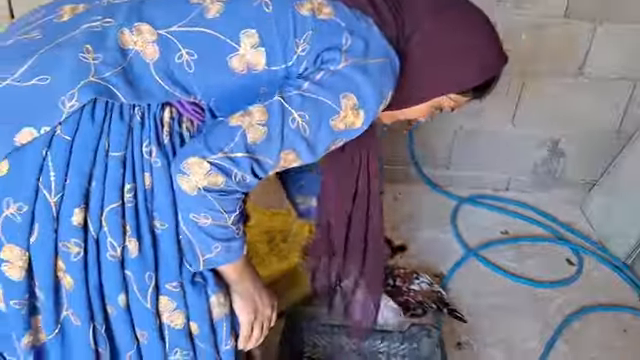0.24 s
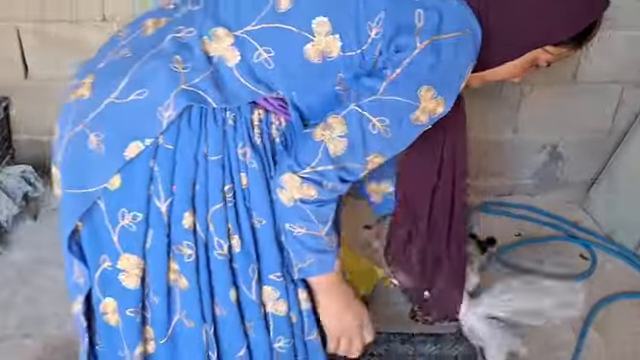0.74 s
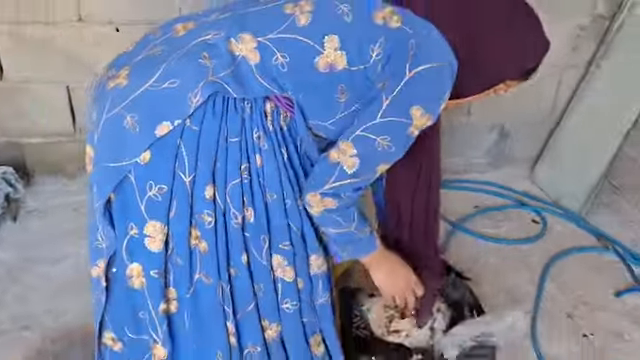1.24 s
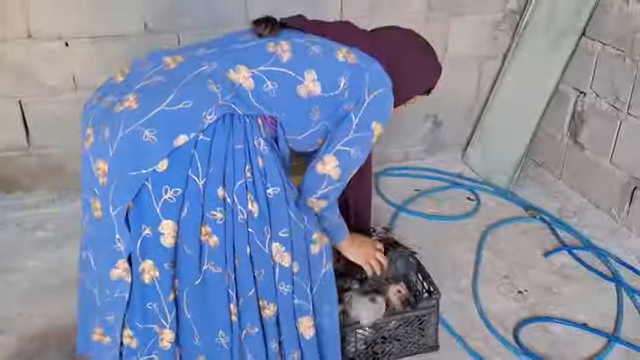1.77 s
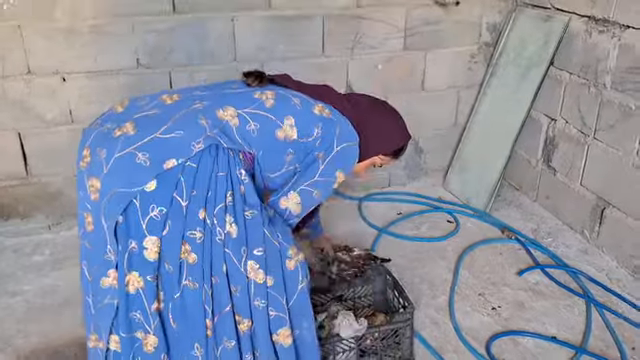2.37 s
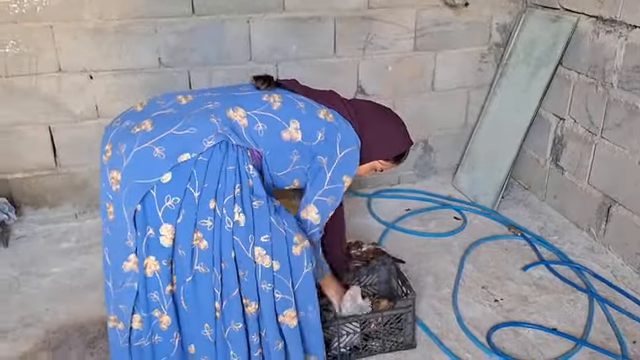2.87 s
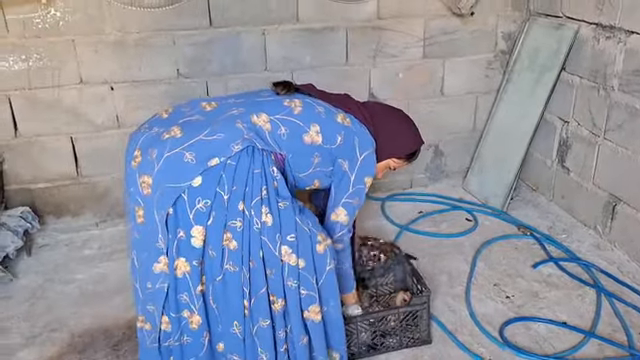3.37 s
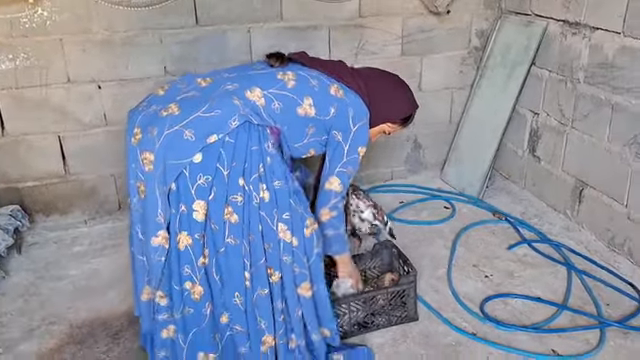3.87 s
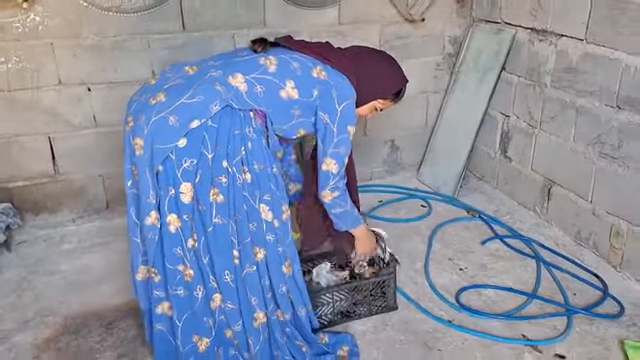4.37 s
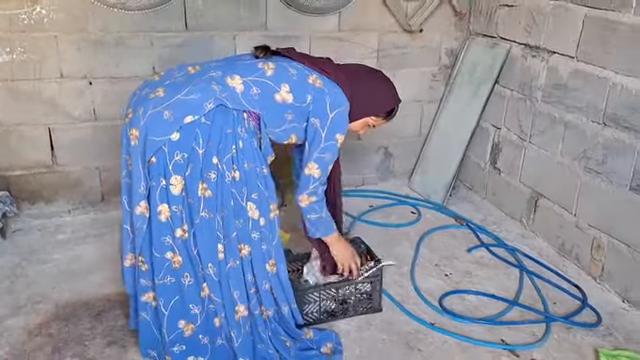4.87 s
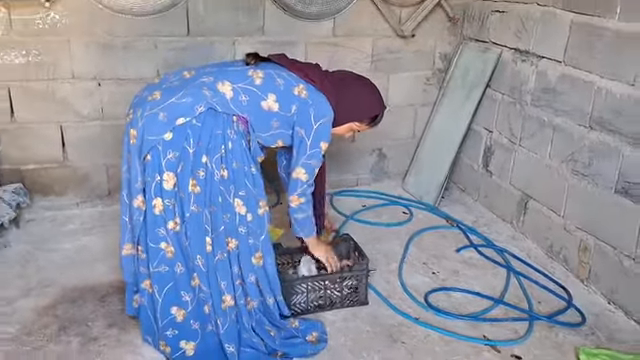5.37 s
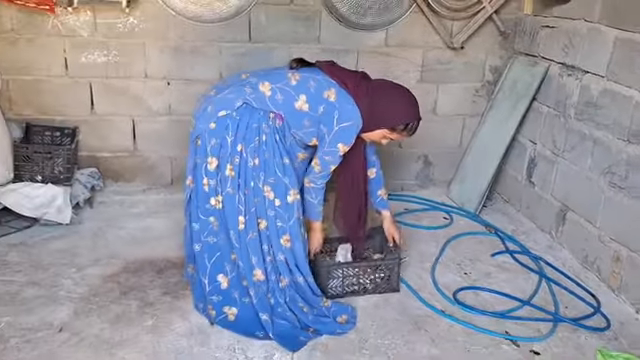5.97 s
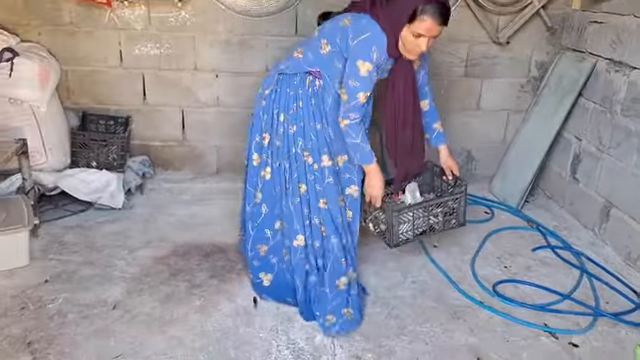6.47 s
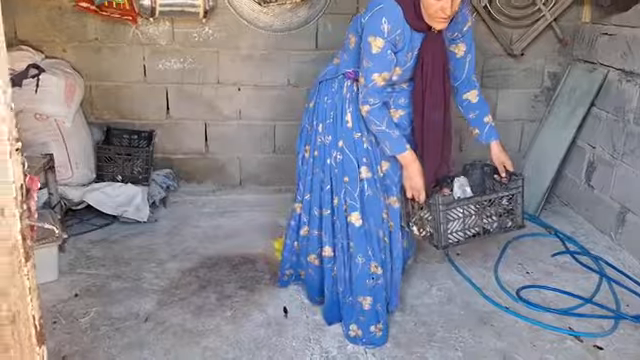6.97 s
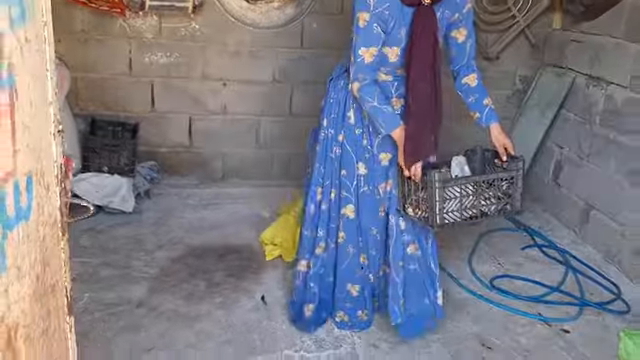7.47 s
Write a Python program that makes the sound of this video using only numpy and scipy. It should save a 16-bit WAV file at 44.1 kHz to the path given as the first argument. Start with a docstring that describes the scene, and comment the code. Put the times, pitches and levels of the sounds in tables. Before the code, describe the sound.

Loud, raspy chicken cries and short clucks with soft rustling, then a plastic crate scrapes and ticks lightly as a motor hum grows.

```python
"""A hen squawks, clucks and shrieks while hands push her into a plastic crate in a bare block shed.
Feathers and a bag rustle from the start as banded noise; each cry is a sum of partials of a flapping syrinx.
A motor hums throughout as wavering sines over a rumble, louder in the second half, above faint air noise.
Late on, the crate scrapes in noise strokes as it is lifted, and ticks ring its resonances.
A thin high hiss swells at the very end."""
import sys
import numpy as np
from scipy import signal
from scipy.fft import rfft, irfft, next_fast_len
from scipy.io import wavfile
from scipy.ndimage import uniform_filter1d

SR = 44100
rng = np.random.default_rng(int(sys.argv[2]) if len(sys.argv) > 2 else 0)


def output_pcm(signal):
    """Save a mono or channel-first signal as 16-bit PCM at the path in sys.argv[1].

    Samples are clipped to [-1, 1] before scaling.
    """
    pcm = np.clip(np.atleast_2d(signal).T, -1, 1) * 32767
    wavfile.write(sys.argv[1], SR, np.round(pcm).astype(np.int16))


N = 341334


def from_db(db):
    """Gain of a level in dB."""
    return 10 ** (np.asarray(db) / 20)


def rms_one(x):
    """Scaled to rms 1."""
    return x / np.sqrt(np.mean(x ** 2) + 1e-20)


def in_time(rows):
    """Columns of a curve, one value per sample."""
    s, *columns = np.transpose(rows)
    return [np.interp(np.arange(N) / SR, s, c) for c in columns]


def at_hz(points, hz):
    """Spectrum table read on a log frequency axis."""
    table_hz, value = np.array(points).T
    return np.interp(np.log(hz), np.log(table_hz), value)


def band_pass(order, edges_hz, x):
    """Butterworth band-pass."""
    return signal.sosfilt(signal.butter(order, edges_hz, "band", fs=SR, output="sos"), x)


def drift(rate_hz, size=N):
    """Slow random wander of rms 1: noise through a double one-pole low-pass, start-up discarded."""
    r = np.exp(-2 * np.pi * rate_hz / SR)
    run_in = 20000
    wander = signal.lfilter([1], [1, -2 * r, r * r], rng.standard_normal(size + run_in))
    return rms_one(wander[run_in:])


def banded_noise(spectrum, patchy_db, likeness):
    """Half-octave bands of stereo noise, each with its own level, flicker and left-right likeness; rms 1."""
    out = 0
    edges_hz = 25 * 2 ** np.arange(0, 9.6, .5)
    white = rng.standard_normal((2, 2, N))
    flicker = [drift(14.7) for _ in range(4)]
    for k, (low_hz, high_hz) in enumerate(zip(edges_hz, edges_hz[1:])):
        mid, side = band_pass(2, [low_hz, high_hz], white[k % 2])
        hz = np.sqrt(low_hz * high_hz)
        alike = np.clip(at_hz(likeness, hz), -1, 1)
        # one flicker shared by all bands, one by every third
        gain = from_db(at_hz(spectrum, hz) + patchy_db * (flicker[0] + flicker[1 + k % 3]))
        out = out + gain * (np.sqrt(1 + alike) * mid + np.sqrt(1 - alike) * side * [[1], [-1]])
    return rms_one(out)


def faded(size, rise_s, fall_s):
    """Linear ramps at both ends of a stretch."""
    t = np.arange(size) / SR
    return np.clip(np.minimum(t / rise_s, (t[-1] - t) / fall_s), 0, 1)


def swell(start_s, rise_s, hold_s, fall_s, depth_db=-25):
    """Gain that climbs, holds and sinks, linear in dB; silent outside."""
    corners_s = start_s + np.cumsum([0, rise_s, hold_s, fall_s])
    levels_db = [depth_db, 0, 0, depth_db]
    return from_db(np.interp(np.arange(N) / SR, corners_s, levels_db, left=-200, right=-200))


# voice manners: (roughness [0-1], share of cry before it breaks [0-1], roughness once broken [0-1],
#   half-pitch share [0-1])
CLEAR, FRAYING, THIN = (.05, .95, .1, .05), (.05, .8, .5, .05), (.16, .5, .25, .06)
BREAKING, HOARSE = (.28, .35, .5, .35), (.3, .5, .42, .2)
HARSH, RASPING = (.42, .5, .6, .2), (.5, .3, .62, .1)
TEARING, CLEARING = (.17, .3, .52, .15), (.38, .5, .14, .15)
BUZZY, DOUBLED, CROAKY = (.36, .5, .48, .6), (.38, .5, .52, .9), (.55, .5, .75, .7)
# long cries: (beak resonance [Hz], mouth resonance [Hz], beak prominence [dB],
#   windpipe tone, rasp, sheen [dB re breath], manner)
SQUAWKS = [ (1750, 2750, 6.6, -7, -2, -9.5, TEARING), (1370, 2700, 8.7, 0, 1, -10.5, BREAKING),
           (2060, 3520, 8.9, 0.5, -3, -12.5, CLEAR), (1720, 4670, 17.3, -1, -7, -12.5, BUZZY),
           (1610, 3470, 5.7, 0.5, -2, -12, FRAYING), (1820, 1730, 12, -4, -1.5, -5.5, CLEAR),
           (1665, 3180, 15, -5.5, -5, -13.5, DOUBLED), ]
# course of each long cry: (time [s], pitch [Hz], breath [dB], gain from the open beak [dB])
SQUAWK_EFFORT = [
    [(.048, 595.6, -31.5, 1), (.073, 621.4, -26.5, -2), (.109, 700.4, -27.5, 6), (.183, 625, -31, 4),
     (.22, 640.4, -74, -5)],
    [(1.375, 604, -39, 0), (1.39, 618, -28.5, -10), (1.412, 660, -31, 8.5), (1.462, 646.6, -27.5, 4),
     (1.562, 628.7, -28.5, -1.5), (1.62, 628, -62.5, 9)],
    [(2.33, 661, -30.5, 7), (2.364, 673, -26, -2), (2.424, 659.7, -26, -4), (2.486, 657, -29.5, 1),
     (2.588, 656.5, -30.5, 1.5), (2.724, 644, -32.5, 8.5), (2.76, 656.4, -53, -2)],
    [(2.762, 560, -40, 3), (2.785, 563, -37.5, 6.5), (2.82, 549, -38.5, 9), (2.884, 618, -30.5, 1.5),
     (2.978, 617, -28, -2), (3.028, 607, -32.5, 3.5), (3.08, 593, -48.5, 3)],
    [(3.72, 664, -28.5, -19), (3.756, 635.4, -32.5, -8.5), (3.854, 637.4, -31, -9), (3.94, 636.3, -32, 4),
     (3.994, 625.4, -33.5, 7), (4.024, 599.6, -38.5, 2.5), (4.07, 593, -58.5, 7)],
    [(4.38, 600, -27, -1), (4.394, 624, -30, -2.5), (4.432, 615.7, -32.5, 11.5), (4.486, 620.7, -37, 12),
     (4.6, 616.7, -30.5, 2.5), (4.63, 623, -28, 8.5)],
    [(6.215, 686, -37, 22), (6.233, 692, -34, 7.5), (6.255, 593, -33, 5.5), (6.325, 638.5, -25, 3),
     (6.433, 580, -29.5, 6.5), (6.48, 592, -46, -5)],
]
# short cries: (start [s], rise [s], hold [s], fall [s], peak [dB], change over the hold [dB],
#   first pitch [Hz], last pitch [Hz], beak resonance [Hz], mouth resonance [Hz],
#   beak prominence [dB], windpipe tone, rasp, sheen [dB re peak], manner)
CLUCKS = [ (.418, .027, .01, .065, -24.5, -1.5, 604.3, 596, 1510, 2700, 14, -12, -10, -14, BUZZY),
          (.72, .016, 0.0097, .05, -28, -5, 557, 555, 1530, 3200, 22, -9.5, -15, -21, CROAKY),
          (0.969, .019, 0.0049, .05, -23, 0.5, 582.5, 582, 1720, 3160, 11, -13.5, -15.5, -24, BUZZY),
          (1.232, .015, .02, 0.062, -24, 1.5, 660.5, 620, 1400, 3470, 3.6, -19, -15.5, -19.5, HARSH),
          (1.675, 0.011, 0.025, 0.052, -26.5, -4, 635.6, 612, 1800, 3460, 3.1, -11, -12, -20, THIN),
          (1.854, .015, 0.023, 0.038, -29, 0.5, 556.6, 582, 1600, 2770, 2.5, -10, -12.5, -21.5, BUZZY),
          (1.94, .024, .085, 0.0055, -33, -9, 563.3, 570, 1720, 3100, 15, -9, -7, -19, CROAKY),
          (2.055, 0.03, .045, .012, -25.5, -8.5, 566, 635, 1220, 3600, 5.8, -4.5, -4, -20, HOARSE),
          (2.139, .012, .17, 0.0082, -37.5, -5, 749.5, 801.5, 1630, 3300, 2.7, 5.5, 3.5, -9, RASPING),
          (3.2, 0.037, 0.0091, 0.049, -39.5, 1, 612.5, 603, 1750, 2750, 10, 1.5, -9, -18, DOUBLED),
          (3.39, .024, 0.043, 0.012, -31.5, -11, 686, 679, 1410, 2730, 7.3, -10.5, -13.5, -22, HARSH),
          (3.5, 0.0099, 0.054, .012, -48.5, 3.5, 702, 701, 1450, 2930, 5.4, 1.5, -13, -33, THIN),
          (3.59, 0.041, 0.077, 0.019, -29, 0, 720, 808, 1550, 3000, 12, -4.5, -14, -30.5, HOARSE),
          (4.101, 0.064, .015, .035, -34, 0, 584.4, 589.4, 1185, 3300, 11, -22, -18, -34, HARSH),
          (4.278, 0.0081, 0.092, .004, -32, 3.5, 658, 613.4, 1655, 2830, 19, -8, -6, -17.5, CLEARING),
          (4.63, .015, 0.041, 0.0035, -21, -4, 632, 634, 1750, 2800, 6.9, -8.5, -9, -11, DOUBLED),
          (4.69, 0.0061, .11, 0.046, -29, -3.5, 577, 544, 1600, 2970, 9.7, -10, -14.5, -24, CROAKY),
          (4.9, 0.03, 0.011, .06, -23.5, -8, 667.5, 637, 1770, 3290, 25, -7.5, -9.5, -17, HOARSE),
          (5.131, 0.0176, .11, 0.055, -29.5, -2.5, 567, 578, 1580, 2820, 11, -6, -9, -18.5, CROAKY),
          (5.381, .04, 0.004, .03, -54, 2.5, 540, 527.3, 1600, 3340, 41, -18, -21, -26, THIN),
          (5.475, 0.026, 0.0049, .03, -30, 1, 530, 492, 1550, 2580, 32, -42, -26, -55, THIN),
          (5.925, 0.013, 0.022, .04, -45.5, 1, 461, 457, 1720, 2800, 20, -6.5, -23, -30, THIN),
          (6.117, .018, .05, .022, -24, -20, 455.5, 453.5, 1340, 2710, 26, -27, -28.5, -36, THIN), ]


def hen():
    """All cries in turn; one that follows without a pause rises more slowly, out of the last."""
    out, last_end_s = np.zeros((2, N)), 0
    cries = [cluck(*row) for row in CLUCKS]
    cries += [voiced(effort, *voice) for effort, voice in zip(SQUAWK_EFFORT, SQUAWKS)]
    for rows, manner, beak_db in sorted(cries, key=lambda c: c[0][0][0]):
        start_s = rows[0][0]
        rise_s = .016 if start_s - last_end_s < .012 else .003
        sound = cry(rows, *manner, beak_db, rise_s)
        start, last_end_s = round(start_s * SR), rows[-1][0]
        out[:, start:start + sound.shape[1]] += sound
    return out


ONSET_DB, DYING_DB = -14, -26   # start and end of a short cry
ABRUPT_S = 0.036   # a quicker rise or fall covers only its share of that
BLOOM = 0.23   # share of the swell that comes from opening the beak


def cluck(start_s, rise_s, hold_s, fall_s, peak_db, change_db, first_hz, last_hz, *voice):
    """Attack, hold and release; the pitch glides evenly from first to last."""
    s = start_s + np.cumsum([0, rise_s, hold_s, fall_s])
    onset_db = ONSET_DB * min(1, rise_s / ABRUPT_S)
    dying_db = DYING_DB * min(1, fall_s / ABRUPT_S)
    shape_db = np.array([onset_db, 0, change_db, change_db + dying_db])
    hz = np.interp(s, [s[0], s[-1]], [first_hz, last_hz])
    return voiced(zip(s, hz, peak_db + (1 - BLOOM) * shape_db, BLOOM * shape_db), *voice)


RASP_FOLLOWS, SHEEN_FOLLOWS = 0.21, 0.48   # share of the beak's gain [dB/dB]


def voiced(effort, beak_hz, mouth_hz, beak_db, low_db, rasp_db, sheen_db, manner):
    """Opening the beak lifts its own band most, rasp and sheen less, the windpipe tone not at all."""
    rows = [(s, hz, beak_hz, mouth_hz, breath_db + gape_db, low_db - gape_db,
             rasp_db - (1 - RASP_FOLLOWS) * gape_db, sheen_db - (1 - SHEEN_FOLLOWS) * gape_db)
            for s, hz, breath_db, gape_db in effort]
    return rows, manner, beak_db


CATCH, CATCH_S, BREAK_S = .3, .018, .04   # extra roughness at onset, its decay time, time to break
BEAK_WIDTH_HZ, MOUTH_WIDTH_HZ, MOUTH_DB = 195, 490, 8
CUTOFF_HZ = 15850
HOP = 64   # samples per partial-size step
# limits between windpipe tone, beak band, rasp and sheen: [Hz]
BAND_EDGES_HZ = [1000, 2300, 5500]
# throat slope inside the bands: (frequency [Hz], level [dB])
THROAT = [(200, -3.5), (330, -6), (630, 3), (950, 2.5), (2400, 0), (3300, -1.5), (4500, 2), (5400, -9),
          (7000, -8.5), (10000, -9), (15500, -24)]
# part of the cry that differs between the ports: (frequency [Hz], level [dB])
APART = [(300, -27), (650, -12), (1300, -1), (4000, 3), (14000, -1.5)]


def cry(rows, rough, breaks_at, broken, half, beak_db, rise_s, jitter=.07, shimmer_db=3.5, sway=.4):
    """The syrinx flaps at the pitch, alternate cycles unequal; rough cycles smear partials into noise."""
    s, *columns = np.transpose(rows)
    t = np.arange(s[0], s[-1] + .016, 1 / SR)
    pitch, beak, mouth, level_db, low_db, rasp_db, sheen_db = [np.interp(t, s, c) for c in columns]

    break_s = s[0] + breaks_at * (s[-1] - s[0])
    rough = rough + (broken - rough) * np.clip((t - break_s) / BREAK_S, 0, 1)
    rough = rough + CATCH * np.exp((s[0] - t) / CATCH_S)
    unsteady = jitter * rough * drift(60, size=len(t)) + .003 * drift(18, size=len(t))
    half_phase = np.pi * np.cumsum(pitch * (1 + unsteady)) / SR

    orders = np.arange(1, int(2 * CUTOFF_HZ / pitch.mean()) + 2)[:, None]   # multiples of half the pitch
    hz = orders * pitch[::HOP] / 2
    beak_peak_db = beak_db / (1 + ((hz - beak[::HOP]) / BEAK_WIDTH_HZ) ** 2)
    mouth_peak_db = MOUTH_DB / (1 + ((hz - mouth[::HOP]) / MOUTH_WIDTH_HZ) ** 2)
    shape = from_db(at_hz(THROAT, hz) + beak_peak_db + mouth_peak_db)

    smear = np.clip(rough[::HOP] * (hz / 1500) ** .5, 0, .95)   # high partials break up first
    tone = np.where(orders % 2, half, 1) * (1 - smear)
    smear = smear * np.where(orders % 2, np.sqrt(half), 1)   # noise gathers round the strong partials

    # each band carries its own share
    power = shape ** 2 * (tone ** 2 + smear ** 2 / 2) / 2
    band = np.digitize(hz, BAND_EDGES_HZ)
    for k, share_db in enumerate((low_db, 0 * low_db, rasp_db, sheen_db)):
        total = np.sum(power * (band == k), axis=0)
        scaled = shape * from_db(share_db[::HOP]) / np.sqrt(total + 1e-9)
        shape = np.where(band == k, scaled, shape)

    noise_size = (4,) + hz.shape
    fast = uniform_filter1d(rng.standard_normal(noise_size), size=2, axis=2) * smear * 0.65
    slow = uniform_filter1d(rng.standard_normal(noise_size), size=25, axis=2) * np.sqrt(25 / 2) * tone
    # the struggling bird turns: every partial sways and reaches the two ports differently
    apart = from_db(at_hz(APART, hz))
    parts = shape * np.array([tone + fast[0] + sway * slow[0],
                              fast[1] + sway * slow[1],
                              apart * (0.89 * fast[2] + slow[2]),
                              apart * (0.5 * fast[3] + slow[3])])

    place = np.arange(len(t)) / HOP
    left_of = np.minimum(place.astype(int), hz.shape[1] - 2)
    share = place % 1
    mid_side = np.zeros((2, len(t)))
    for k, order in enumerate(orders[:, 0]):
        sizes = parts[:, k, left_of] * (1 - share) + parts[:, k, left_of + 1] * share
        angle = order * half_phase + 0.595 * order ** 1.3   # the throat delays higher partials
        mid_side += sizes[::2] * np.sin(angle) + sizes[1::2] * np.cos(angle)
    ports = mid_side[0] + mid_side[1] * np.array([[1], [-1]])
    gain = from_db(level_db + shimmer_db * rough * drift(34, size=len(t)))
    return ports * gain * faded(len(t), rise_s, 0.011)


# crate ticks: (time [s], relative strike level [dB])
TICKS = [(5.789, -28), (6.847, -34), (7.01, -19.5), (7.352, -43)]
# crate resonances: (frequency [Hz], relative level [dB], T60 [s])
TICK_MODES = [(746, 0, .03), (1144, 4.5, .03), (1700, -2, 0.013), (2400, -3, .02), (3650, -13, .015)]


def ticks():
    """Small knocks ring the plastic crate's damped modes."""
    clicks, out = np.zeros(N), np.zeros(N)
    clicks[[round(s * SR) for s, _ in TICKS]] = from_db(np.array(TICKS)[:, 1] - 22.5)
    for hz, mode_db, t60_s in TICK_MODES:
        r, w = from_db(-60 / (t60_s * SR)), 2 * np.pi * hz / SR
        ring = signal.lfilter([0, np.sin(w)], [1, -2 * r * np.cos(w), r * r], clicks + 1e-18)
        out += from_db(mode_db) * ring
    return out


# reverberation time: (frequency [Hz], T60 [s])
SHED_T60 = [(200, 0.26), (1500, 0.19), (5000, 0.17), (14000, 0.14)]
# colour of the right port re left: (frequency [Hz], level [dB])
RIGHT_COLOUR = [(300, -0.5), (800, -1), (1500, 3), (4000, 4), (8000, -3.5), (14000, 15.5)]


def shed(x, tail_db=-6.0):
    """Each port hears the direct sound and a tail from the block walls that dulls as it dies."""
    size, t = next_fast_len(N + SR), np.arange(SR // 2) / SR
    edges_hz, white = np.geomspace(100, 17000, 8), rng.standard_normal((2, len(t)))
    tail = 0
    for low_hz, high_hz in zip(edges_hz, edges_hz[1:]):
        decay = from_db(-60 * t / at_hz(SHED_T60, np.sqrt(low_hz * high_hz)))
        tail = tail + band_pass(2, [low_hz, high_hz], white) * decay
    response = from_db(tail_db) * rms_one(tail * np.clip(t / 0.014, 0, 1)) / np.sqrt(len(t))
    response[:, 0] = 1   # direct sound
    hz = np.arange(size // 2 + 1) * SR / size + 1
    colour = from_db(at_hz(RIGHT_COLOUR, hz) * np.array([[-.5], [.5]]))
    return irfft(rfft(x, size) * rfft(response, size) * colour, size)[:, :N]


# crate handled: (start [s], rise [s], hold [s], fall [s], level [dB])
RUBS = [(5.767, .02, 0.067, 0.081, -52.5), (6.836, 0.012, 0.0044, 0.055, -58),
        (6.924, 0.082, .01, 0.11, -51.5), (7.084, 0.025, 0.057, .04, -57), (7.345, 0.014, 0.13, 0.07, -36)]
# scrape spectrum: (frequency [Hz], relative level [dB per Hz])
CRATE_SPECTRUM = [(240, -36), (400, -17), (1570, -10.5), (1750, -11), (2040, -2), (2650, -8), (3960, -12),
                  (14400, -25), (15800, -20)]


def crate():
    """Short gritty rubs of hands and cloth on the crate: enveloped noise."""
    stroke = sum(from_db(db) * swell(*times) for *times, db in RUBS)
    return stroke * banded_noise(CRATE_SPECTRUM, patchy_db=-0.5, likeness=[(500, 0.26), (8000, 0.12)])


# feathers and bag rubbing: (start [s], rise [s], hold [s], fall [s], treble [dB], body [dB])
RUSTLES = [(0.0, 0.0028, 0.23, .05, -57, -51.5), (0.222, 0.087, 0.081, 0.19, -41.5, -45.5),
           (0.535, 0.018, 0.11, 0.058, -59, -68), (0.659, 0.032, 0.1, 0.081, -57, -54),
           (0.856, 0.047, 0.074, 0.24, -43, -48), (0.993, 0.038, 0.13, 0.28, -51, -54.5),
           (1.19, 0.067, 2.6, .15, -54, -54), (2.89, 0.18, .26, 0.089, -49, -54),
           (3.31, 0.19, 0.77, 0.18, -63, -56.5), (4.22, .3, 0.54, 0.3, -47, -48),
           (5.74, 0.09, .07, 0.054, -71, -60), (5.86, 0.14, 0.33, .2, -52.5, -56),
           (6.298, 0.15, 0.12, 0.16, -69, -61), (7.0, 0.16, .03, 0.11, -59, -64)]
# thin high hiss at the end: (time [s], level [dB])
SWISH = [(7.5, -60), (7.524, -58.5), (7.74, -50.5)]
STILL_DB = (-94, -70.5)   # treble and body floor under the rubs


def rustle():
    """Feathers and thin plastic: bright flickering hiss with a duller body below."""
    rubs = sum(from_db(row[4:])[:, None] * swell(*row[:4]) for row in RUSTLES)
    treble, dull = from_db(STILL_DB)[:, None] + rubs
    noise = banded_noise([(500, -30.0), (900, -1.5), (5000, -3.5), (15000, 5)], patchy_db=2.0,
                         likeness=[(500, 0.16), (8000, 0.019)])
    top = rms_one(band_pass(4, [5660, 22000], noise))
    body = rms_one(band_pass(4, [405, 4540], noise))
    thin = rms_one(band_pass(4, [5630, 9800], noise))
    swish = from_db(in_time(SWISH)[0]) * (np.arange(N) > SWISH[0][0] * SR)
    return treble * top + dull * body + swish * thin


HUM_HZ = 99.5
# motor, louder towards the door: (time [s], hum [dB], rumble before its lift [dB])
HUM = [(0.0, -51.5, -62.5), (1.4, -48, -58.5), (3.86, -42.5, -55.5), (4.5, -41, -51.5), (5.5, -43, -59.5),
       (6.15, -39, -48), (6.5, -39.5, -54), (7.74, -39.5, -48.5)]
# further hum lines: (multiple of the hum [1], level [dB re hum])
HUM_PARTNERS = [(1.135, -10.5), (2.0, -20), (2.64, -21.5)]
# rumble spectrum: (frequency [Hz], relative level [dB per Hz])
RUMBLE = [(25, -36), (45, -5.5), (70, 6.5), (130, -6), (300, -5.5), (600, -36.5)]
# likeness of the ports in rumble and air: (frequency [Hz], left-right likeness [0-1])
LIKENESS = [(60, 0.47), (240, 0.8), (950, 0.03), (3770, 0.06), (15000, 0.15)]


def motor():
    """A wavering hum over a rumble; its near neighbour makes it throb."""
    hum_db, rumble_db = in_time(HUM)
    phase = 2 * np.pi * HUM_HZ * np.arange(N) / SR
    lines = np.sin(phase + 0.61 * drift(3.6)) * from_db(1.45 * drift(3.0))
    for multiple, line_db in HUM_PARTNERS:
        line_gain = from_db(line_db + 2.2 * drift(5.2))
        lines += line_gain * np.sin(multiple * phase + 1.45 * drift(2.15))
    rumble = from_db(rumble_db + 5.5) * banded_noise(RUMBLE, patchy_db=2.2, likeness=LIKENESS)
    hum = np.sqrt(2) * from_db(hum_db) * lines
    return (hum + rumble) * from_db([[.9], [-.9]])


AIR_DB = -56
# air spectrum: (frequency [Hz], relative level [dB per Hz])
AIR_SPECTRUM = [(100, -13), (250, -7), (500, -4), (1000, -8), (2000, -11.5), (4000, -38.5), (15000, -43.5)]


def air():
    """Faint flickering noise, weak in the treble."""
    return from_db(AIR_DB) * banded_noise(AIR_SPECTRUM, patchy_db=4.0, likeness=LIKENESS)


# where the hen is held: (time [s], left minus right [dB])
PAN = [(0.0, -2.5), (0.92, -2), (1.45, -2), (4.39, -2.5), (4.67, 2), (5.46, 1), (6.6, -0.5)]


def scene():
    """Hen and ticks in the shed, then rubs, rustles, motor and air."""
    voice = shed(hen() + ticks()) * from_db(in_time(PAN)[0] * np.array([[.5], [-.5]]))
    return voice + crate() + rustle() + motor() + air()


def record(dry):
    """The top is cut steeply by an elliptic low-pass."""
    return signal.sosfilt(signal.ellip(12, .5, 75, CUTOFF_HZ, fs=SR, output="sos"), dry)


dry = scene()
out = record(dry)
output_pcm(out)
```